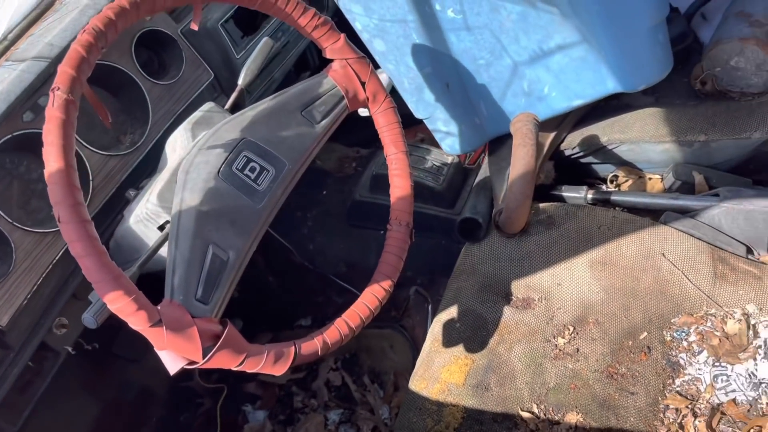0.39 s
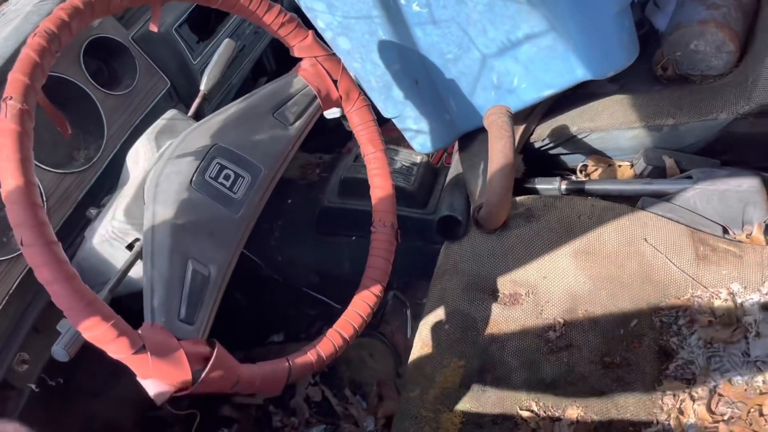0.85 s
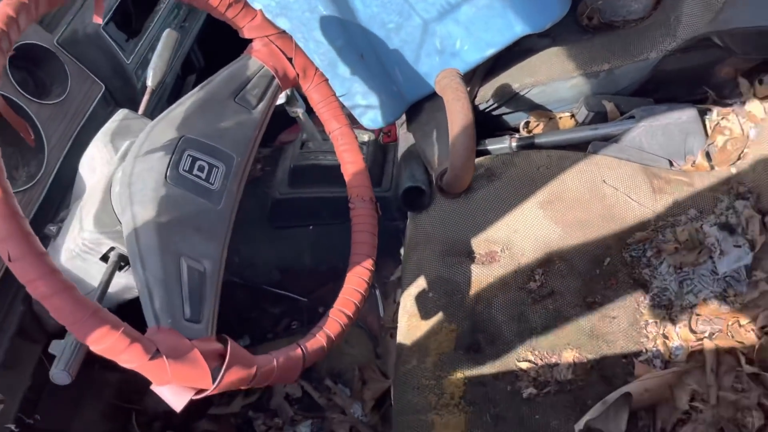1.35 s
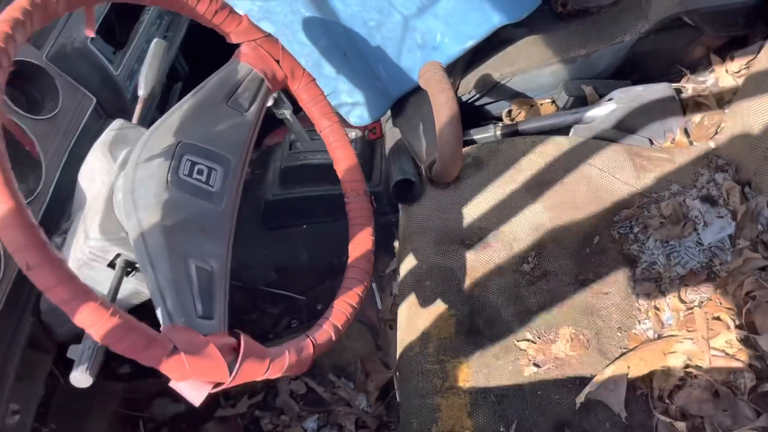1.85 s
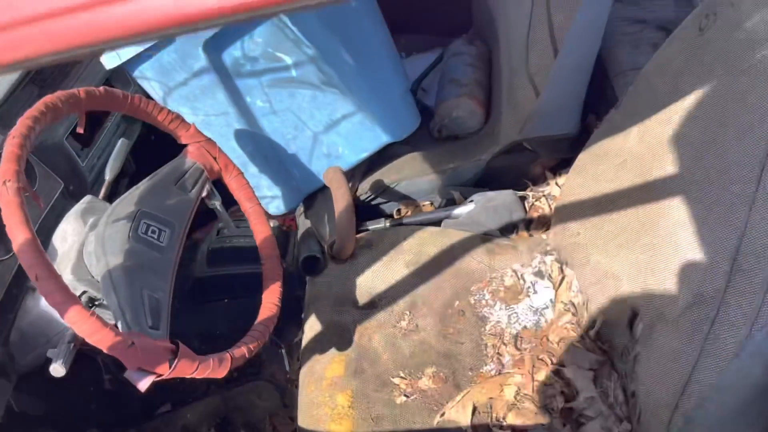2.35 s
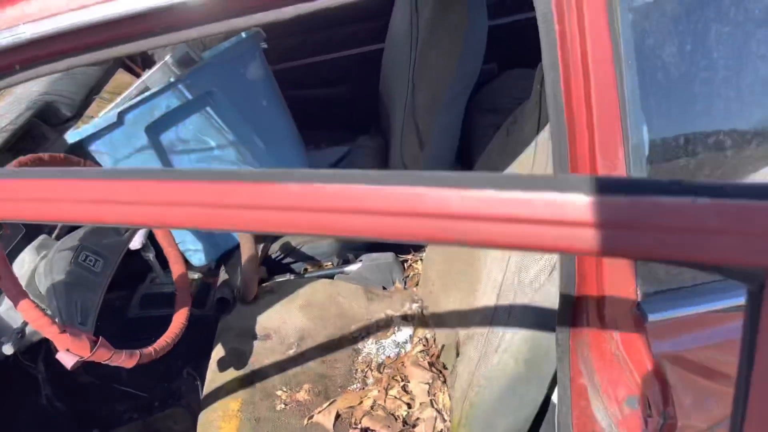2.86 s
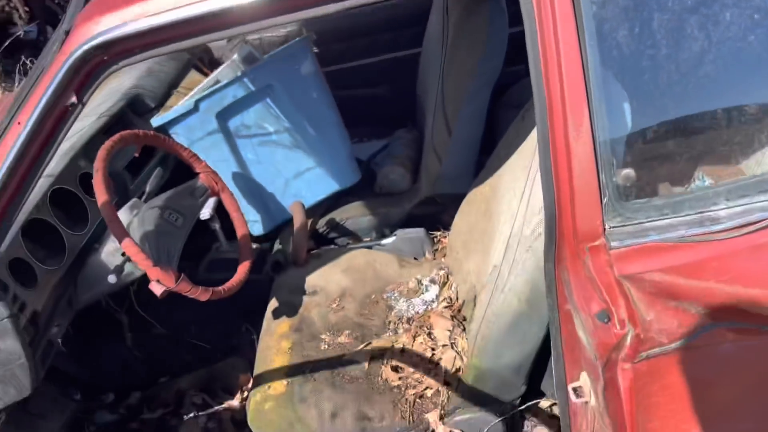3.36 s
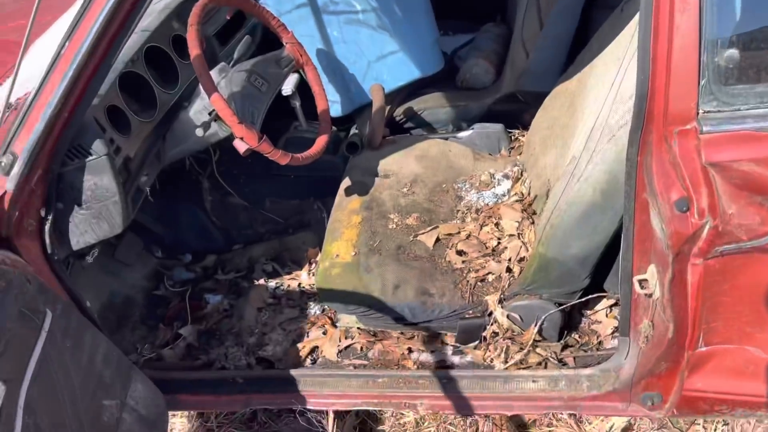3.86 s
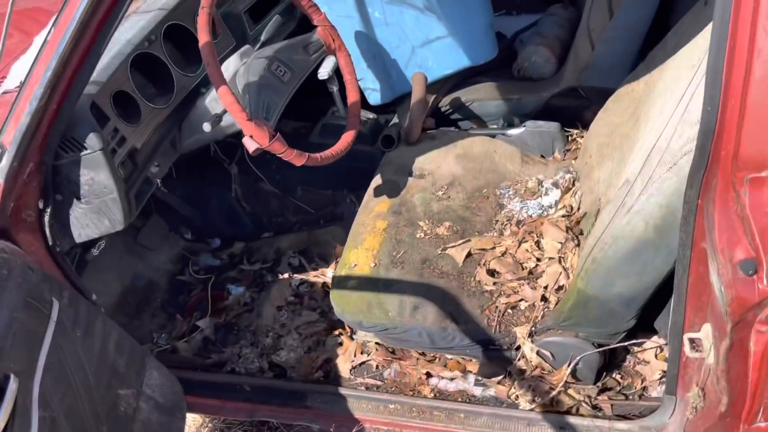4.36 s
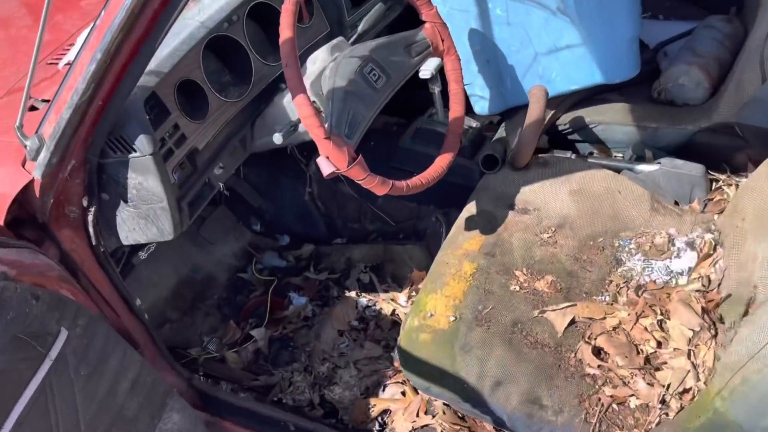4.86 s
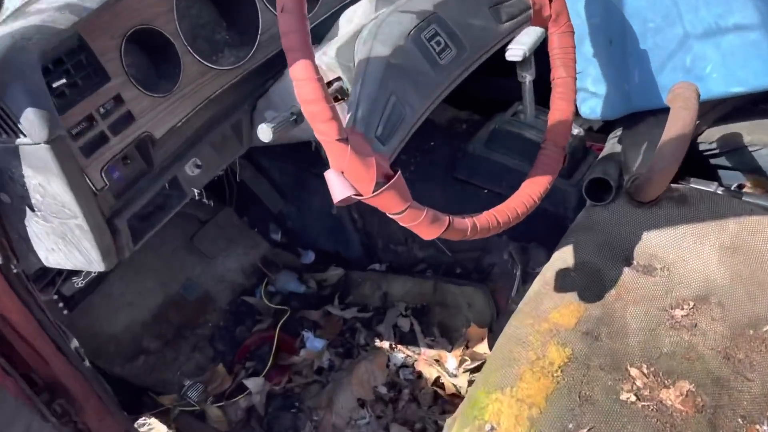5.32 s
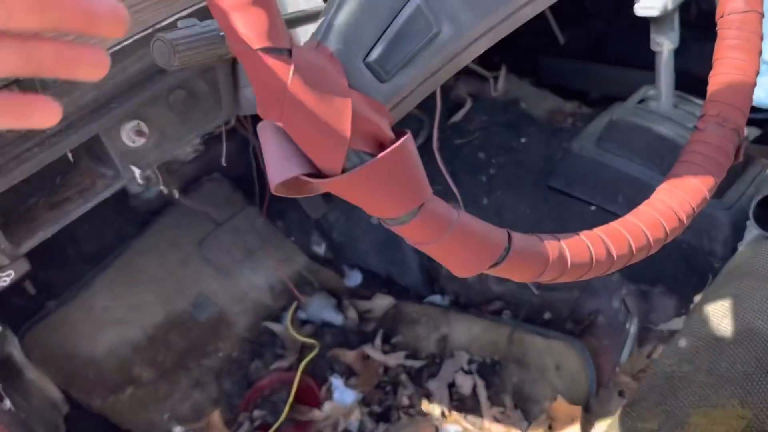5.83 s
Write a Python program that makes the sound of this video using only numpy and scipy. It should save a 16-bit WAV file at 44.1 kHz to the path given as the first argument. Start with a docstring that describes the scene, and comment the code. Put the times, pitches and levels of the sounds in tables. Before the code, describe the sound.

Outdoors, close to a rusty old car, dry leaves and cloth rustle and snap while the metal groans faintly. The heavy door's latch lets go with a deep, booming clunk, quickly followed by a hard metallic knock. Rustling continues, the hand-held microphone rumbles, and the door bangs against its stop. Uneven rustling, ticks and soft bumps carry on, thinning out at the end.

```python
"""Outdoors, someone leans on a rusty car and shuffles in dry leaves: bursts of noise rustle, snap and groan.
At 1.6 s the latch of the heavy door lets go with a clunk that booms, and at 1.9 s comes a knock:
each blow rings a set of fading sines and a haze of noise. Near 3.8 s the door hits its stop in the same way.
Leaves and cloth rustle to the end, and the hand-held microphone rumbles and is bumped now and then.
Two close ports hear the sound with a phase lag; the boom and the bumps reach both alike."""
import sys
import numpy as np
from scipy import signal
from scipy.fft import rfft, irfft, next_fast_len
from scipy.io import wavfile

SR = 44100
rng = np.random.default_rng(int(sys.argv[2]) if len(sys.argv) > 2 else 0)


def gain_from_db(level_db):
    """Convert decibel levels to linear amplitude factors (20 dB per decade)."""
    decades = np.asarray(level_db, float) / 20
    return 10 ** decades


def inscribe(sig):
    """Save sig as 16-bit PCM at rate SR to the path in sys.argv[1].

    A 1-D sig is mono; a 2-D sig holds one channel per row.
    Samples are clipped to [-1, 1] before scaling.
    """
    pcm = np.round(np.clip(np.atleast_2d(sig).T, -1, 1) * 32767)
    wavfile.write(sys.argv[1], SR, pcm.astype(np.int16))


N = 273727  # length in samples


def at_hz(points, hz):
    """Read a table between its points, with pitch on a log scale as the ear has it."""
    f, v = np.transpose(points)
    return np.interp(np.log(np.maximum(hz, 1)), np.log(f), v)


def rms_one(x):
    """Scale a sound to an rms of 1."""
    return x / np.sqrt(np.mean(x ** 2) + 1e-20)


def filtered(x, points):
    """Make each pitch louder or softer by a table of f/Hz, level/dB."""
    size = next_fast_len(N)
    gain = gain_from_db(at_hz(points, np.fft.rfftfreq(size, 1 / SR)))
    return irfft(rfft(x, size) * gain, size)[..., :N]


def colour(x, spectrum):
    """Shape noise by a spectrum that falls away outside its ends; rms 1."""
    low_end, high_end = (spectrum[0][0] / 2, -70), (spectrum[-1][0] * 2, -90)
    return rms_one(filtered(x, [low_end] + list(spectrum) + [high_end]))


def drift(rate):
    """Slow chance of spread 1: smoothed noise that wanders faster when the rate in Hz is higher."""
    r = np.exp(-40 * np.pi * rate / SR)  # one point for every 20 samples
    noise = rng.standard_normal(N // 20 + 2002)
    slow = signal.lfilter([1], [1, -2 * r, r * r], noise)[2000:]  # leave out the run-in
    return np.interp(np.arange(N) / 20, np.arange(len(slow)), rms_one(slow))


def ring(clicks, hz, t60):
    """A resonance: a click of height 1 starts a sine of height 1 that fades by 60 dB in t60 seconds."""
    r, w = gain_from_db(-60 / (t60 * SR)), 2 * np.pi * hz / SR
    return signal.lfilter([0, np.sin(w)], [1, -2 * r * np.cos(w), r * r], clicks + 1e-18)


def random_sizes(size_db):
    """Uneven heights of random sign, for small snaps in the direct and the scattered sound."""
    return gain_from_db(size_db * np.minimum(rng.exponential(1, N), 5)) * rng.choice([-1, 1], (2, N))


def friction(spectrum, per_s, size_db, grain_db, clump_db):
    """Rubbing: hiss and random micro-snaps, both in clumps; rows are the direct and scattered sound."""
    grains = rms_one(random_sizes(size_db) * (rng.random(N) < per_s / SR))
    clumps = gain_from_db(clump_db * (drift(45.0) + 0.18 * drift(7.0)))
    hiss = rng.standard_normal((2, N))
    return colour((hiss + gain_from_db(grain_db) * grains) * clumps, spectrum)


def crackle(low_hz, high_hz, per_s, cycles, size_db):
    """Sparse snaps, each ringing at one of 14 pitches; higher pitches fade sooner."""
    sizes = random_sizes(size_db)
    born = rng.random(N) < per_s / SR
    dealt = rng.integers(0, 14, N)  # which pitch each snap gets
    pitches = np.geomspace(low_hz, high_hz, 14)
    return rms_one(sum(ring(sizes * born * (dealt == k), hz, cycles / hz) for k, hz in enumerate(pitches)))


def strokes(rows):
    """Loudness of overlapping strokes: each swells to its peak and fades, and their powers add."""
    roundness = 1.34  # 1 = pointed peak, 2 = round
    t, power = np.arange(0, N + 32, 32) / SR, 0
    for s, rise, fall, level_db in rows:
        away = np.where(t < s, (s - t) / rise, (t - s) / fall)  # at 1 the stroke is 10 dB below its peak
        power = power + gain_from_db(level_db - 10 * away ** roundness) ** 2
    return np.interp(np.arange(N) / SR, t, np.sqrt(power))


# spectrum of quiet open air: f/Hz, level/dB (per Hz, relative)
AIR_SPECTRUM = [(18, -44), (30, -6), (81, -1.5), (97, -15), (160, -22), (950, -33), (8440, -33.5),
                (11400, -35), (13000, -61.5)]


def open_air():
    """Steady, soft noise of open air."""
    level_db = -64.5
    return gain_from_db(level_db) * colour(rng.standard_normal((2, N)), AIR_SPECTRUM)


# spectrum of a hand on the microphone: f/Hz, level/dB (per Hz, relative)
HANDLING_SPECTRUM = [(25, -31), (40, 3), (60, -1.5), (90, -4.5), (140, -12), (250, -23.5)]
# the hand shifts its grip: peak t/s, rise t/s, fall t/s (both to 10 dB below the peak), level/dB
HAND_SHIFTS = [(.16, .07, .015, -58), (.244, .03, 0.027, -56), (.372, .04, 0.027, -59),
               (.5, .06, 0.26, -58), (.69, .03, .06, -57.5), (.82, .06, 0.025, -40),
               (.888, .015, 0.02, -30.5), (1.12, .15, 0.054, -42), (1.252, .06, 0.049, -46),
               (1.45, .12, 0.17, -51.5), (1.8, .3, 0.18, -52), (2.13, .15, 0.086, -39),
               (2.32, .08, 0.048, -36.5), (2.53, .15, 0.31, -45.5), (2.95, .2, 0.11, -61.5),
               (3.13, .05, 0.049, -37), (3.238, .007, 0.1, -33.5), (3.34, .06, 0.033, -31),
               (3.42, .02, 0.043, -25.5), (3.53, .03, .02, -18), (3.63, .025, 0.12, -31.5),
               (3.73, .045, 0.022, -22.5), (3.88, .12, .08, -33), (3.98, .04, 0.043, -30.5),
               (4.1, .08, .09, -40), (4.3, .1, 0.29, -51), (4.64, .05, 0.06, -47), (4.79, .04, 0.027, -46),
               (4.84, .015, 0.023, -34), (4.93, .05, 0.08, -40), (5.06, .07, 0.051, -29.5),
               (5.25, .1, .08, -56), (5.4, .055, 0.064, -28), (5.55, .1, 0.095, -40.5),
               (5.79, .08, 0.071, -67), (6.06, .03, .035, -54)]


def handling():
    """The hand shifting on the microphone: lumpy low rubbing noise."""
    hand = friction(HANDLING_SPECTRUM, per_s=22.0, size_db=0.0, grain_db=-3.5, clump_db=1.0)
    return strokes(HAND_SHIFTS) * hand


# bumps against the hand and the body work: t/s, level/dB (before the soft start), f/Hz, t60/s
BUMP_EVENTS = [(0.871, -16.5, 91, 0.114), (3.407, -18, 106.2, 0.055), (3.516, -20, 85.2, 0.17),
               (3.699, -19, 53.3, 0.14), (3.966, -11, 80, .056), (5.045, -27, 74, 0.13),
               (5.07, -17.5, 90.5, 0.089), (5.374, -29, 129.4, 0.16), (5.408, -23, 97.5, 0.13),
               (5.513, -21.5, 75, 0.13)]


def bumps():
    """Soft pushes: low sines that start gently and die away within a few cycles."""
    rise_s, length = 0.004, 12000
    out, t = np.zeros(N), np.arange(length) / SR
    for s, start_db, hz, t60 in BUMP_EVENTS:
        loudness = gain_from_db(start_db - 60 * t / t60) * (1 - np.exp(-t / rise_s))
        out[round(s * SR):][:length] += loudness * np.sin(2 * np.pi * hz * t)
    return out


# spectrum of the groaning metal: f/Hz, level/dB (per Hz, relative)
GROAN_SPECTRUM = [(100, -9.5), (180, -0.5), (300, 1.5), (500, -2), (800, -8.5), (1500, -29.5)]
# the loaded panel and body groan: peak t/s, rise t/s, fall t/s (both to 10 dB below the peak), level/dB
GROAN_STROKES = [(.19, 0.0051, .025, -54.5), (.372, 0.044, 0.011, -57.5), (.466, 0.039, 0.096, -54),
                 (.72, 0.068, 0.086, -43), (.888, 0.016, 0.13, -57), (1.03, 0.022, 0.045, -33),
                 (1.18, 0.079, 0.039, -44), (1.33, 0.041, 0.052, -53.5), (1.55, 0.052, .1, -72.5),
                 (1.9, 0.33, 0.13, -42.5), (2.256, 0.028, 0.064, -46.5), (2.53, 0.12, 0.11, -45),
                 (2.8, 0.2, 0.045, -48), (3.08, 0.43, 0.1, -47), (3.232, 0.016, 0.036, -49),
                 (3.4, 0.078, 0.13, -48.5), (3.52, 0.022, 0.018, -49.5), (3.622, 0.032, 0.11, -49),
                 (3.706, .006, .035, -37.5), (3.92, 0.076, 0.082, -40.5), (4.03, 0.046, 0.099, -49.5),
                 (4.6, 0.33, 0.29, -53), (4.76, 0.0085, 0.057, -46.5), (4.845, 0.019, 0.031, -42),
                 (4.96, 0.025, 0.15, -53.5), (5.07, 0.011, 0.075, -42), (5.4, 0.087, 0.029, -47),
                 (5.53, .05, 0.01, -45), (5.59, 0.016, 0.045, -46), (5.87, 0.096, 0.062, -49.5),
                 (6.1, 0.086, .1, -60.5), (6.205, 0.045, 0.016, -47.5)]


def groans():
    """The loaded panel groans: grainy rubbing, which also sets the door's low modes ringing."""
    groan = friction(GROAN_SPECTRUM, per_s=250.0, size_db=2.0, grain_db=-6.0, clump_db=2.0)
    low_modes = [(hz, t60) for hz, t60, *_ in DOOR_RINGS if hz < 900]
    # here the modes fade sooner than their table says
    panel = rms_one(sum(ring(groan, hz, 0.27 * t60) for hz, t60 in low_modes))
    return strokes(GROAN_STROKES) * (groan + gain_from_db(-9.5) * panel)


# spectrum of the crisp top of leaves and cloth: f/Hz, level/dB (per Hz, relative)
CRISP_SPECTRUM = [(1500, -25), (3000, -14), (5000, -8), (7000, -2), (8500, -2), (10500, -1.5), (13000, 1.5),
                  (16000, 4.5)]
# spectrum of the duller scuffing: f/Hz, level/dB (per Hz, relative)
SCUFF_SPECTRUM = [(350, -18.5), (700, -6.5), (1200, -0.5), (2200, -2), (3500, -4), (6000, -11)]
# strokes through cloth and dry leaves: peak t/s, rise t/s, fall t/s (both to 10 dB below the peak),
# level/dB of the crisp part, level/dB of the scuff relative to it
RUSTLE_STROKES = [(0.203, 0.021, 0.073, -53, -11), (.46, 0.082, 0.3, -52, -9.5),
                  (.6, 0.15, .04, -50.5, -11), (0.691, 0.11, 0.085, -32.5, -14.5),
                  (.738, 0.019, 0.011, -34, -8.5), (0.791, 0.018, 0.035, -33.5, -12.5),
                  (0.867, 0.0072, 0.033, -40.5, -11), (1.0, 0.18, .05, -44.5, -18),
                  (1.048, 0.037, 0.009, -42.5, 0), (1.16, 0.26, 0.15, -50, -4),
                  (1.317, 0.012, 0.042, -53, 6.5), (1.41, 0.048, 0.073, -44, -9),
                  (1.49, 0.018, 0.18, -46, -9), (1.74, 0.077, 0.018, -42.5, -1.5),
                  (1.8, 0.052, 0.036, -40.5, -12), (1.86, 0.025, 0.033, -39, 0.5),
                  (2.101, 0.044, 0.099, -38.5, -15.5), (2.3, 0.21, 0.24, -42.5, -8),
                  (2.55, 0.22, 0.21, -42.5, -20.5), (2.64, 0.071, 0.05, -36, -16.5),
                  (2.7, 0.019, 0.017, -30, -14.5), (2.77, 0.034, 0.094, -40.5, -7.5),
                  (2.93, 0.099, 0.1, -52, -1), (3.07, 0.44, 0.17, -43, -6.5),
                  (3.438, 0.16, 0.11, -43.5, -8), (3.622, .05, 0.094, -47.5, -7.5),
                  (3.74, 0.01, .03, -51.5, .5), (3.912, 0.0062, 0.026, -40, -12),
                  (3.969, 0.0065, 0.014, -39, 4.5), (4.0, 0.0074, 0.014, -45.5, -5),
                  (4.069, 0.058, 0.068, -42, -11), (4.25, 0.061, 0.22, -44, -13),
                  (4.49, 0.069, 0.13, -44, -11), (4.82, .18, 0.098, -37, -11.5),
                  (5.03, 0.2, 0.09, -38.5, -15), (5.089, 0.03, 0.043, -51, 5),
                  (5.139, 0.064, 0.078, -43, -11), (5.261, 0.022, 0.017, -40, -14),
                  (5.38, 0.065, 0.058, -30.5, -10), (5.412, .008, 0.038, -38, -9),
                  (5.57, 0.093, 0.026, -35.5, -6.5), (5.72, 0.24, 0.19, -45, -10.5),
                  (5.858, 0.036, 0.041, -60, 10), (5.961, 0.029, 0.057, -51.5, -18),
                  (6.1, 0.061, 0.3, -61.5, -4.5), (6.205, .02, .02, -52, -8)]


def rustle():
    """Dry leaves and cloth: crisp rubbing on top, duller scuffing with pitched crackles below."""
    crisp = friction(CRISP_SPECTRUM, per_s=1500.0, size_db=4.5, grain_db=-4.0, clump_db=2.0)
    scuff = friction(SCUFF_SPECTRUM, per_s=300.0, size_db=4.5, grain_db=-8.5, clump_db=2.5)
    scuff = scuff + gain_from_db(-7.5) * crackle(696.0, 3950.0, per_s=150.0, cycles=14.0, size_db=4.0)
    bright = [row[:4] for row in RUSTLE_STROKES]
    dull = [(s, rise, fall, db + dull_db) for s, rise, fall, db, dull_db in RUSTLE_STROKES]
    return strokes(bright) * crisp + strokes(dull) * scuff


# snaps and ticks of leaves, cloth and loose trim: t/s, level/dB (peak of the direct sound), centre f/Hz
SNAP_EVENTS = [(.1735, -42, 8550), (.194, -32.5, 7700), (.3485, -38.5, 7220), (.441, -43, 3020),
               (.466, -32, 1230), (.4868, -29.5, 8300), (.5564, -28.5, 4900), (.581, -28.5, 7000),
               (.594, -34, 5000), (.6422, -26, 8040), (.6694, -19.5, 7900), (.735, -9.5, 12000),
               (.866, -27, 7800), (1.046, -27, 7960), (1.084, -36, 1150), (1.169, -50, 660),
               (1.17, -35, 2300), (1.194, -35, 3280), (1.257, -45, 2200), (1.3192, -33.5, 3300),
               (1.3798, -38, 8700), (1.4167, -22.5, 11200), (1.4934, -20, 12000), (1.4974, -37, 8980),
               (1.5295, -28, 9300), (1.7386, -30, 8300), (1.8349, -39, 1500), (2.189, -45, 1480),
               (2.246, -37, 850), (2.5227, -28, 8700), (2.53, -36.5, 900), (2.555, -22, 11600),
               (2.635, -24, 8600), (2.6988, -14.5, 11200), (2.7054, -19.5, 7840), (2.731, -33, 666),
               (2.7526, -24, 11400), (2.777, -35, 606), (2.799, -21, 11700), (2.908, -33, 730),
               (2.973, -40, 1490), (3.041, -36, 1550), (3.226, -39, 860), (3.907, -18.5, 4200),
               (4.0011, -19.5, 9400), (4.0584, -29, 6660), (4.293, -39, 1220), (4.38, -43.5, 1420),
               (4.849, -46, 816), (4.919, -27, 11100), (5.025, -23, 9400), (5.067, -25.5, 7900),
               (5.081, -29.5, 1460), (5.4072, -23, 1810), (5.4815, -30.5, 2100), (5.5095, -20, 8860),
               (5.5774, -22, 7990), (5.628, -34, 2330), (5.662, -31.5, 7690), (5.7475, -32.5, 1830),
               (5.8028, -23.5, 11400), (5.829, -27, 1570), (5.842, -34.5, 654), (5.8595, -30.5, 1650),
               (5.874, -36.5, 600), (5.9017, -33, 11250), (6.112, -42.5, 3040)]


def snaps():
    """Each snap is a click and a short burst of noise in a band; high ones die sooner."""
    width, click_db, length = 0.56, 3.5, 4000
    t60_at_1khz_s, shorter_when_high = 0.052, 0.43  # the second is a power of the pitch
    out, t = np.zeros((2, N + length)), np.arange(length) / SR
    for s, peak_db, hz in SNAP_EVENTS:
        edges = [hz / (1 + width), min(hz * (1 + width), .45 * SR)]
        band = signal.butter(2, edges, "band", fs=SR, output="sos")
        t60 = t60_at_1khz_s * (1000 / hz) ** shorter_when_high
        force = rng.standard_normal((2, length)) * gain_from_db(-60 * t / t60)
        force[:, 0] = gain_from_db(click_db) * np.sqrt(SR / hz)  # the click
        burst = signal.sosfilt(band, force)
        out[:, round(s * SR):][:, :length] += gain_from_db(peak_db) * burst / np.abs(burst[0]).max()
    return out[:, :N]


def boom():
    """The hollow door's lowest breathing mode: after the clunk its pitch sags as the swing shrinks."""
    start_s, rise_s, start_db, fade_db_per_s = 1.623, 0.0081, -17, 15
    start_hz, rest_hz, sag_s = 139.4, 52, 0.0329
    kick_db, rock_db, rock_hz, settle_s = 4, 17, 28.8, 0.037  # early extra level; the door rocks, then settles
    dip_s, dip_db, still_s, change_s = 1.905, -12, 2.1, .012  # the level drops just after the knock, later it ends
    waver_db = 3.0
    now = np.arange(N) / SR
    t = np.maximum(now - start_s, 0)
    hz = rest_hz + (start_hz - rest_hz) * np.exp(-t / sag_s)
    rocking = np.exp(-t / settle_s) * (kick_db + rock_db * np.sin(2 * np.pi * rock_hz * t))
    dip, still = [.5 + .5 * np.tanh((now - s) / change_s) for s in (dip_s, still_s)]  # 0 to 1
    level = gain_from_db(start_db - fade_db_per_s * t + rocking + dip_db * dip + waver_db * drift(26.0))
    phase = 2 * np.pi * np.cumsum(hz * (t > 0)) / SR
    wave = np.sin(phase + 0.27 * drift(22.4))  # the phase wanders a little
    return np.sqrt(2) * level * (1 - np.exp(-t / rise_s)) * (1 - still) * wave


# blows on the door: t/s, thud level/dB, clang level/dB, slope above the clang (dB per octave),
# ring length (factor on the fading times below)
DOOR_BLOWS = [(1.603, -48, -33, -0.5, 2), (1.620, -14, -13, -3.5, 1.11), (1.633, -23, -26, 0.5, 1.15),
              (1.656, -15, -39, 0, 1.17), (1.869, -40.5, -44, 8, 0.96), (1.877, -14, -10, -1, 0.43),
              (1.886, -31, -19.5, -1.45, 0.74), (3.733, -37.5, -28.5, -9.5, 0.67),
              (3.766, -41.5, -33.5, -5.5, 1.2), (3.786, -15, -9, -2, 0.49), (3.794, -16, -17, -2.5, 0.78),
              (3.961, -28, -47, 4.7, 0.5)]
# fading of the dense sheet-metal ring: f/Hz, t60/s
HAZE_FADING = [(150, 0.48), (250, 0.53), (500, 0.3), (1000, 0.21), (3000, 0.12), (12000, 0.089)]
# clear modes of the door (the groans ring the low ones too): f/Hz, t60/s,
# level/dB when struck at the latch, at the striker, at the stop
DOOR_RINGS = [(136.5, 0.32, -8, -19, -25), (146, 0.62, -12, -22, -11.5), (195.5, 0.72, -6.5, -4.5, -16),
              (245, 0.14, -21.5, 13, -1.5), (304, 0.085, 4, -9.5, -1), (355, .2, -3.5, -6, 7),
              (439, 0.19, -1.5, -3, -26), (517, 0.14, -4.5, 6.5, -20), (689.5, 0.11, 8.5, -0.5, -2.5),
              (781, 0.2, -10.5, -5, -0.5), (1033, 0.11, -16, -17, -3), (1219, .1, -22.5, 2, -2),
              (1455, 0.058, -5, -11.5, -30.5), (1950, 0.087, -6.5, -11.5, -1.5),
              (2180, 0.07, -11, -14.5, -3), (2350, 0.066, -17.5, -2, -1.5), (3230, 0.035, -6, -13.5, -11.5),
              (3810, 0.09, -29, -12.5, -7)]
# bright ping of the latch: t/s, list of f/Hz, level/dB, t60/s
PING = (1.879, [(6423, -50, .1), (6615, -29, .12)])


def blows():
    """Each blow rings the door's clear modes and a dense haze of others that dies band by band."""
    modes_db, haze_db, air_loss_db = -2.2, -7.5, 7.5
    thud_hz, clang_hz, top_hz = 190, 600, 7000
    striker_from_s, stop_from_s = 1.8, 3.0
    out, t = np.zeros((2, N)), np.arange(round(.9 * SR)) / SR
    edges = 140 * 2 ** np.arange(0, 7.1, .5)  # half-octave bands
    banks = [signal.butter(2, pair, "band", fs=SR, output="sos") for pair in zip(edges, edges[1:])]
    for s, thud_db, clang_db, slope_db, longer in DOOR_BLOWS:
        top_db = clang_db + slope_db * np.log2(top_hz / clang_hz)
        strength = [(thud_hz, thud_db), (clang_hz, clang_db), (top_hz, top_db), (2 * top_hz, top_db - air_loss_db)]
        sound = 0
        for low, bank in zip(edges, banks):
            hz = low * 2 ** .25  # middle of the band
            fading = gain_from_db(-60 * t / (longer * at_hz(HAZE_FADING, hz)))
            haze = signal.sosfilt(bank, rng.standard_normal((2, len(t))) * fading)
            # the root makes up for the little noise that a narrow low band lets through
            sound = sound + gain_from_db(at_hz(strength, hz) + haze_db) * np.sqrt(SR / hz) * haze
        place = (s > striker_from_s) + (s > stop_from_s)  # 0 latch, 1 striker, 2 stop
        for hz, t60, *place_db in DOOR_RINGS:
            chance_db = rng.normal(0, 1.4, (2, 1))
            height = gain_from_db(at_hz(strength, hz) + place_db[place] + modes_db + chance_db)
            height = height * rng.choice([-1, 1], (2, 1))
            sound = sound + height * np.sin(2 * np.pi * hz * t) * gain_from_db(-60 * t / (longer * t60))
        i = round(s * SR)
        out[:, i:i + len(t)] += sound
    click = np.zeros(N)
    click[round(PING[0] * SR)] = 1
    return out + sum(gain_from_db(db) * ring(click, hz, t60) for hz, db, t60 in PING[1])


# part that differs between the ports: f/Hz, level/dB
SCATTERED_PART = [(60, -7), (150, -12.5), (300, -11), (700, -9), (1500, -5), (4000, -7.5), (8000, -8),
                  (10200, -23.5), (12000, -14.5)]
# balance of the ports: f/Hz, level/dB (left minus right)
BALANCE = [(60, 0.5), (180, 0.5), (550, 2.5), (1650, 0), (4970, 4.5), (15000, -2)]


def ports(sound, phase):
    """Two ports share the direct sound, get the scattered part in opposite sign, and differ in phase and level."""
    direct, scattered = sound
    sides = direct + filtered(scattered, SCATTERED_PART) * [[1], [-1]]
    size = next_fast_len(N + 4096)
    hz = np.fft.rfftfreq(size, 1 / SR)
    # half of each difference goes to the left, the opposite half to the right
    lead = np.exp(.5j * np.interp(hz, *np.transpose(phase)))
    tilt = gain_from_db(at_hz(BALANCE, hz) / 2) * lead
    return irfft(rfft(sides, size) * [tilt, 1 / tilt], size)[:, :N]


# phase of close sounds: f/Hz, lead of the left port (radians)
NEAR_PHASE = [(0, 0), (1120, 0.6), (1890, -0.3), (3100, 0.7), (6630, 0.1), (7920, 0.8), (8870, -0.4),
              (9730, -2.4), (11700, -5.9), (12900, -6.5), (13400, -9.3), (14000, -9.4), (14600, -12.6),
              (16400, -12.5)]
# phase of the door, which stands to one side: f/Hz, lead of the left port (radians)
DOOR_SIDE_PHASE = [(0, 0), (250, .4), (600, 1.3), (1200, 1.4), (2200, .8), (6550, .2), (8010, .6),
                   (8870, -.3), (9400, -1.7), (11500, -5.6), (12800, -6.5), (14600, -12.6), (16400, -12.5)]


def scene():
    """The door is heard from its own direction, the rest from close by; boom and bumps reach both ports alike."""
    near = ports(open_air() + handling() + groans() + rustle() + snaps(), NEAR_PHASE)
    door = ports(blows(), DOOR_SIDE_PHASE)
    return near + door + boom() + bumps()


def low_pass(x):
    """Removes everything above the highest recorded frequency."""
    return signal.sosfilt(signal.butter(12, 16830, fs=SR, output="sos"), x)


# overall colour of the sound, bright near 10.5 kHz, with uneven holes and a cutoff above 12 kHz: f/Hz, level/dB
OVERALL_COLOUR = [(30, -12), (60, -1), (7000, 1.5), (10500, 7.5), (12000, 0), (12700, -24), (13200, -13),
                  (13800, -33.5), (15300, -13.5), (15900, -30), (16300, -67.5)]


def record(dry):
    """Peaks are rounded off smoothly, then comes the overall colour."""
    top = .92  # the rounded peaks stay below this
    rounded = dry / (1 + np.abs(dry / top) ** 4) ** (1 / 4)
    mix = filtered(rounded, OVERALL_COLOUR)
    return low_pass(mix)


dry = scene()
out = record(dry)
inscribe(out)
```